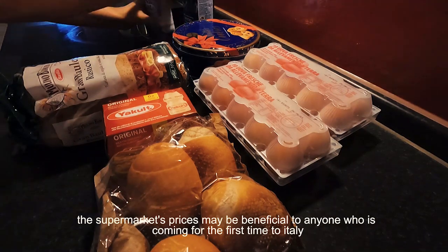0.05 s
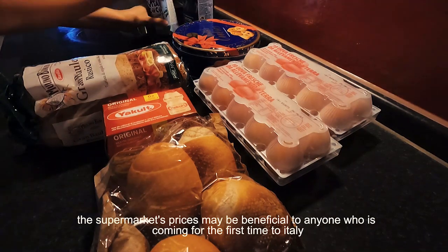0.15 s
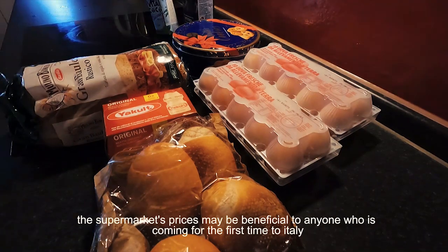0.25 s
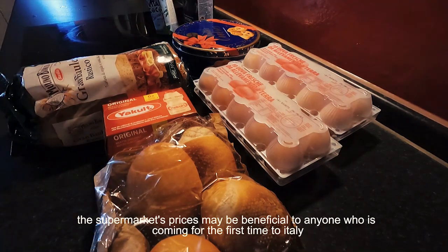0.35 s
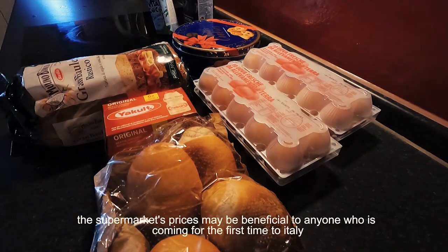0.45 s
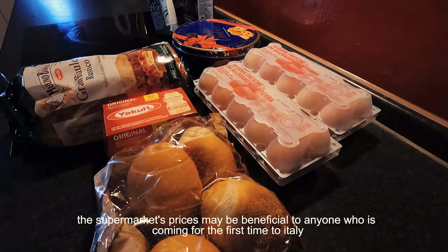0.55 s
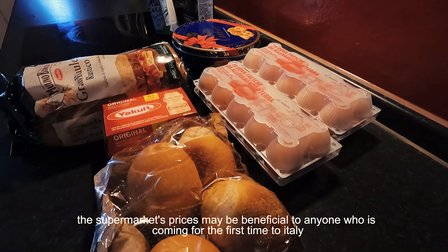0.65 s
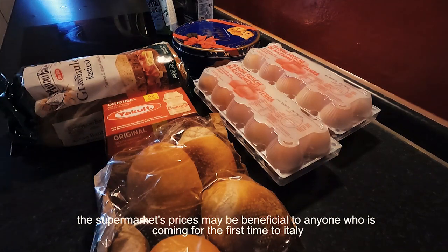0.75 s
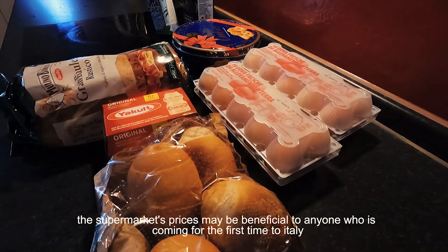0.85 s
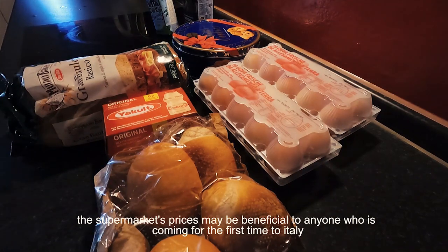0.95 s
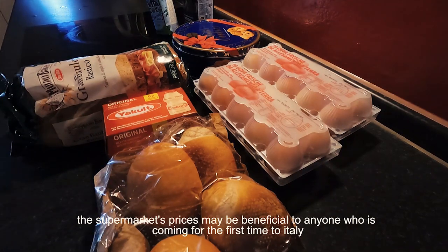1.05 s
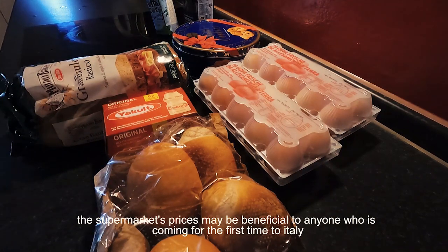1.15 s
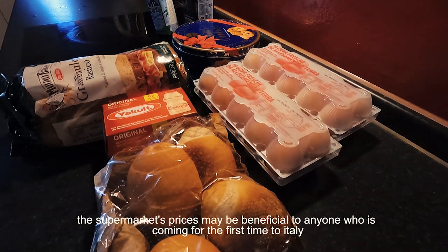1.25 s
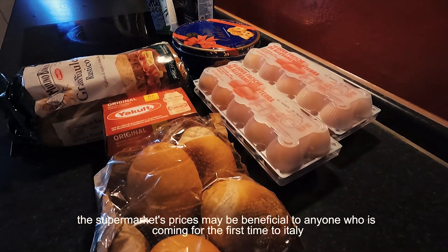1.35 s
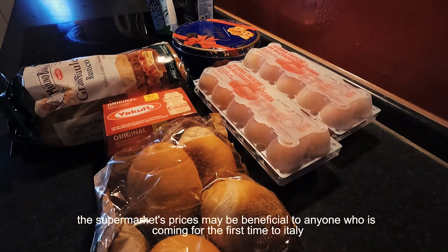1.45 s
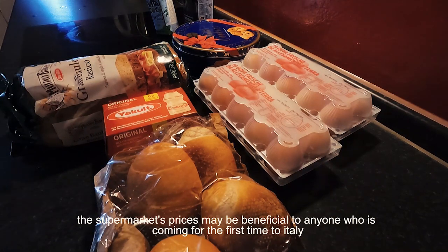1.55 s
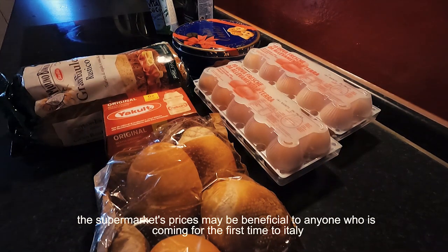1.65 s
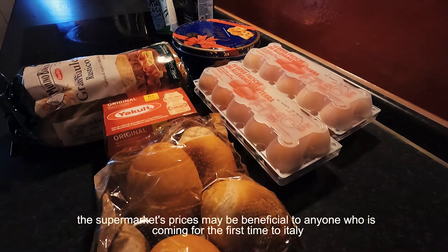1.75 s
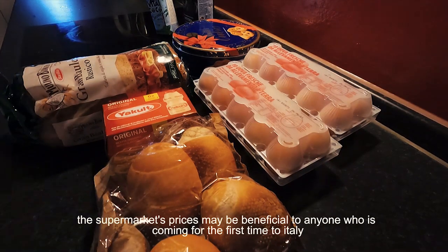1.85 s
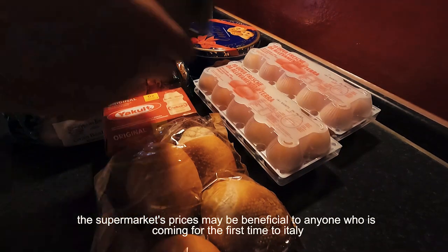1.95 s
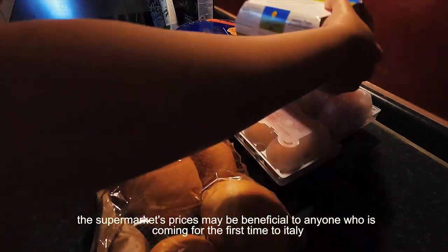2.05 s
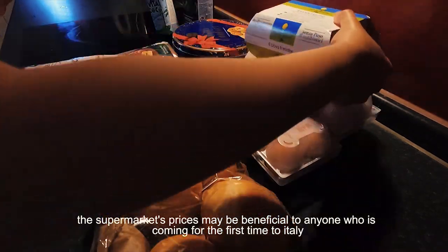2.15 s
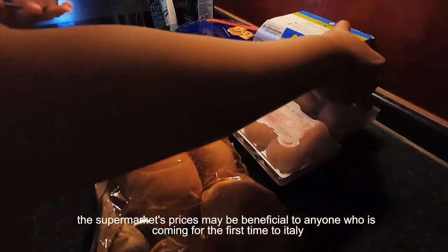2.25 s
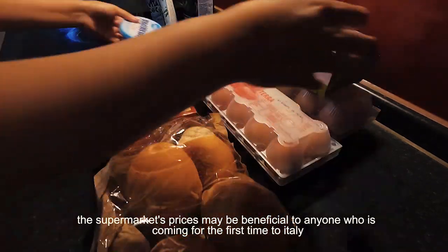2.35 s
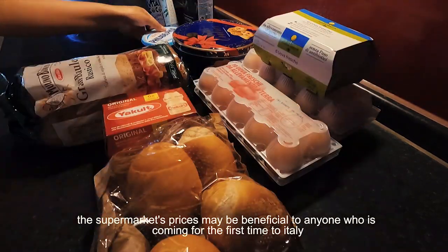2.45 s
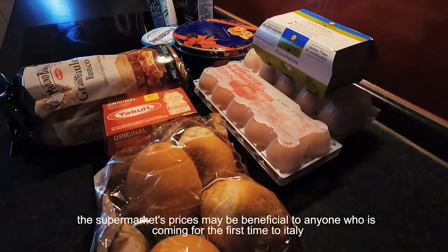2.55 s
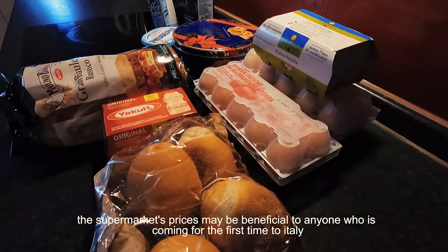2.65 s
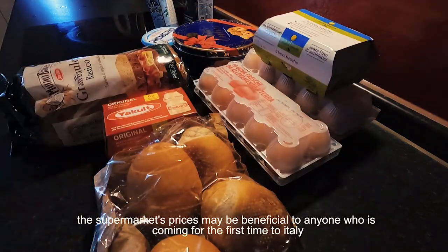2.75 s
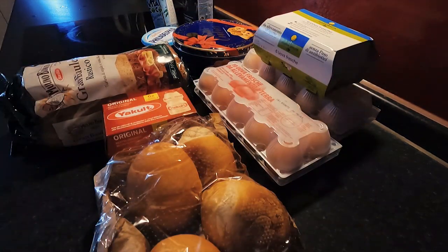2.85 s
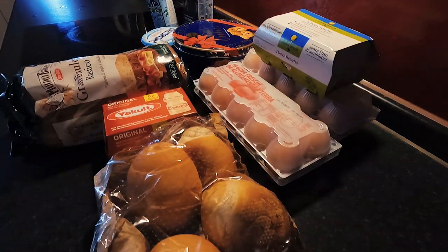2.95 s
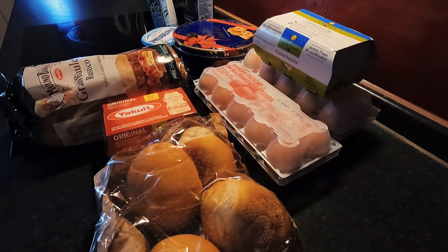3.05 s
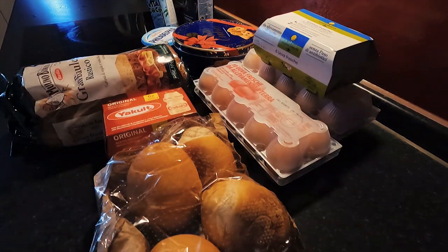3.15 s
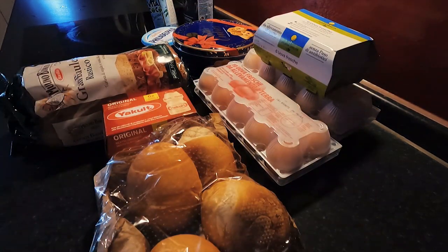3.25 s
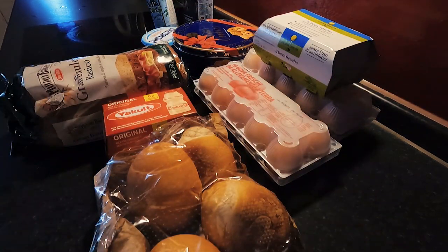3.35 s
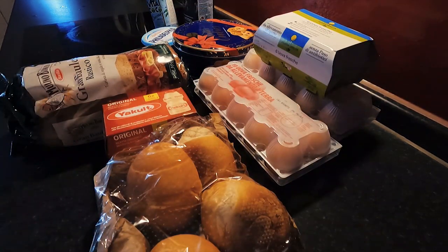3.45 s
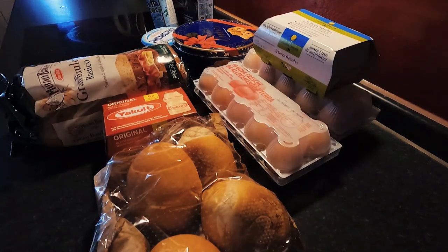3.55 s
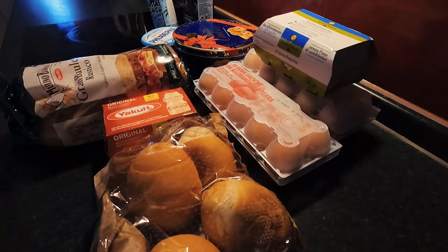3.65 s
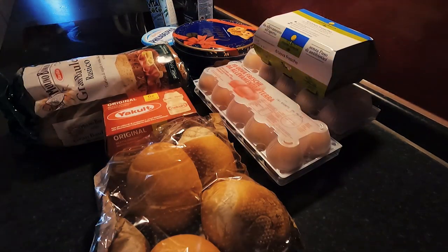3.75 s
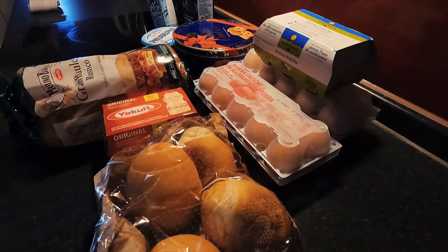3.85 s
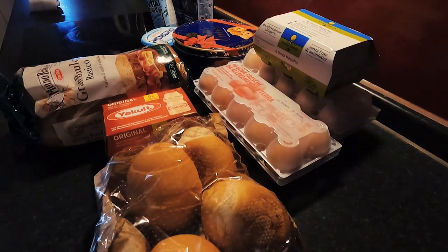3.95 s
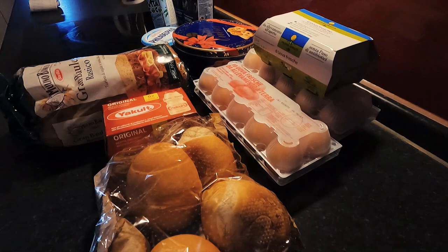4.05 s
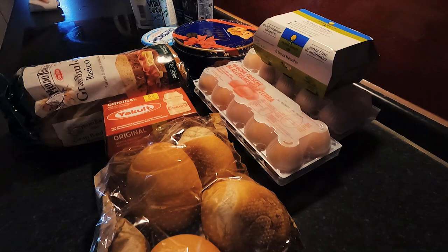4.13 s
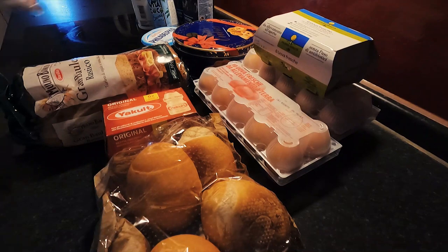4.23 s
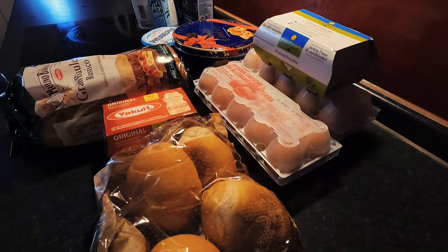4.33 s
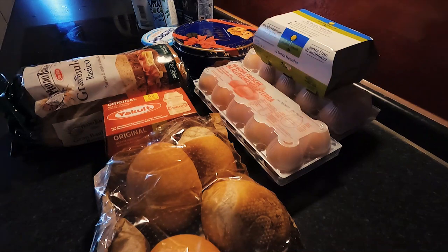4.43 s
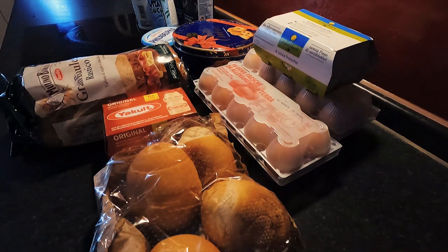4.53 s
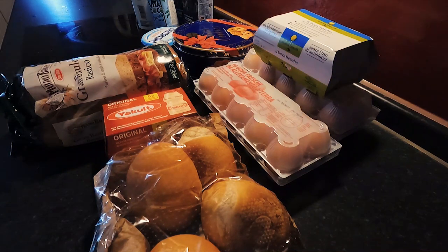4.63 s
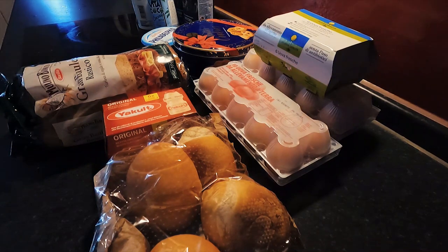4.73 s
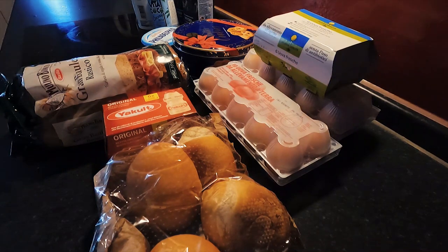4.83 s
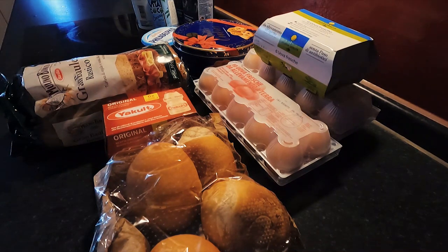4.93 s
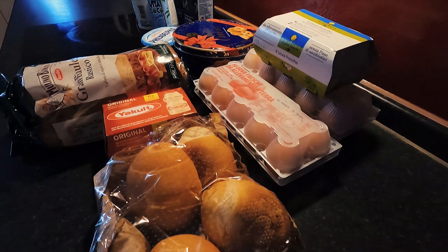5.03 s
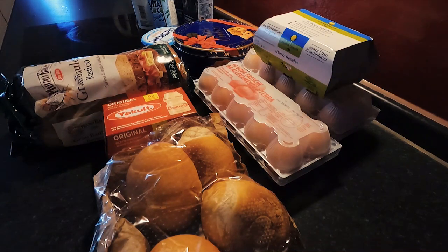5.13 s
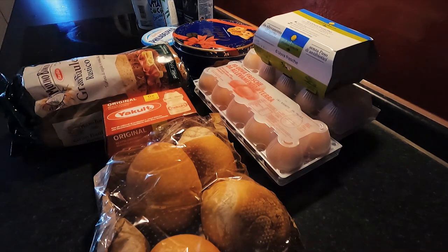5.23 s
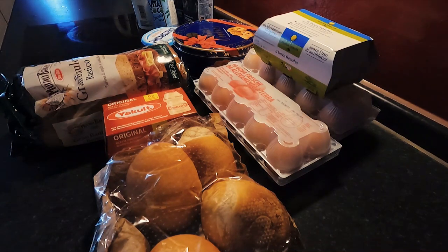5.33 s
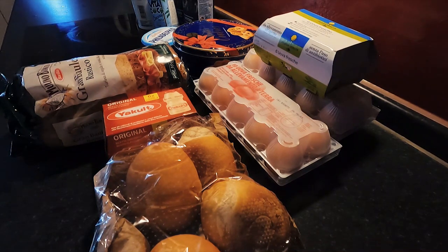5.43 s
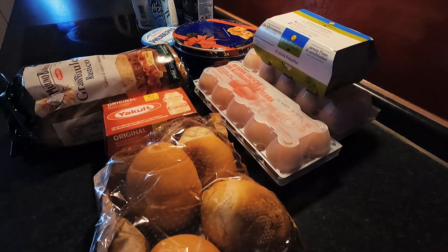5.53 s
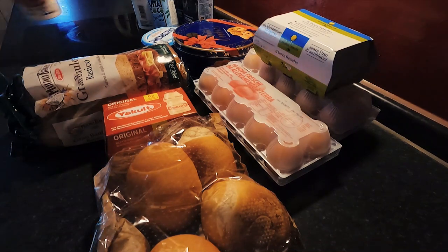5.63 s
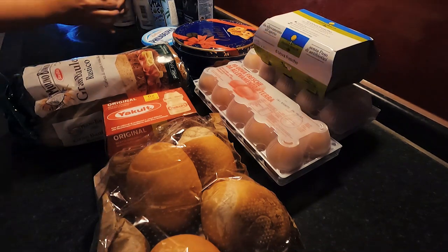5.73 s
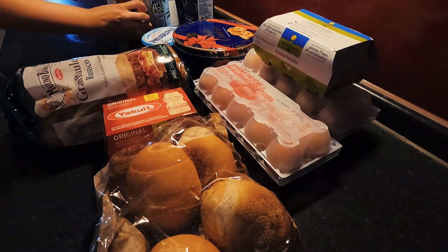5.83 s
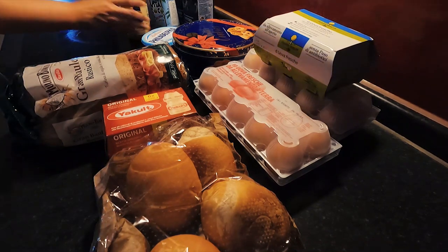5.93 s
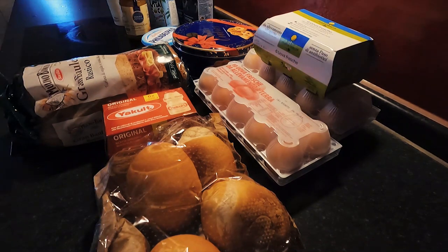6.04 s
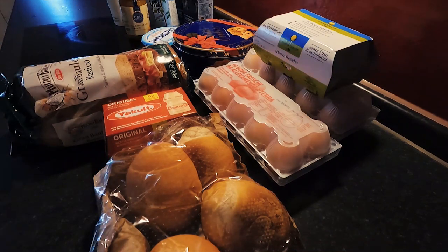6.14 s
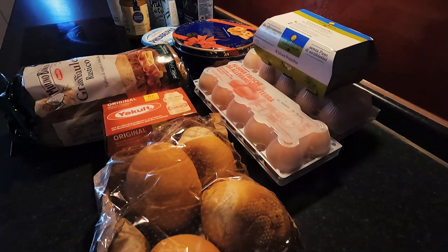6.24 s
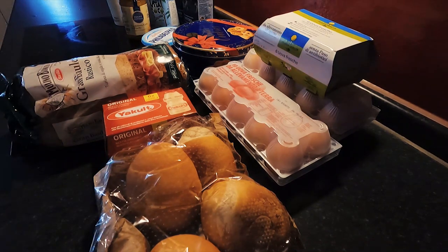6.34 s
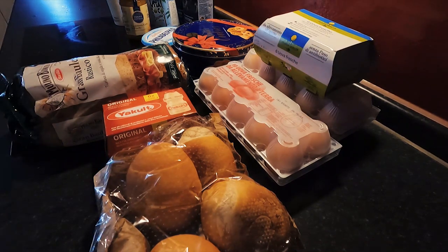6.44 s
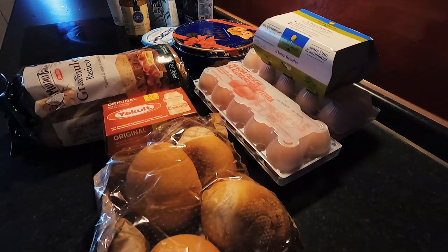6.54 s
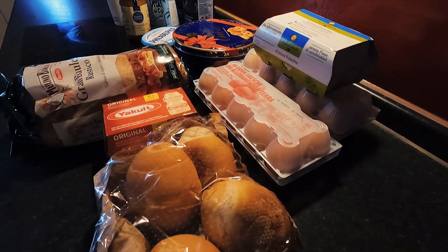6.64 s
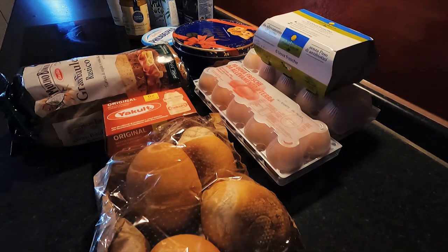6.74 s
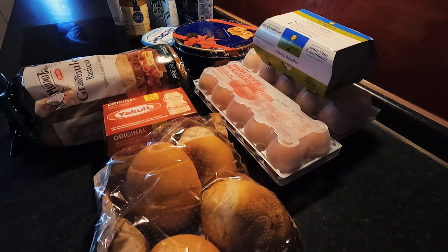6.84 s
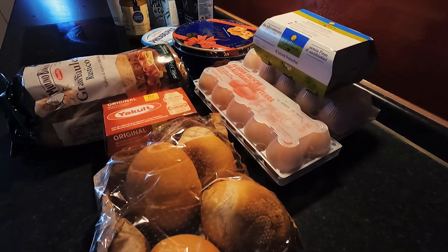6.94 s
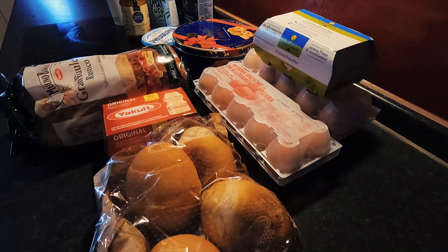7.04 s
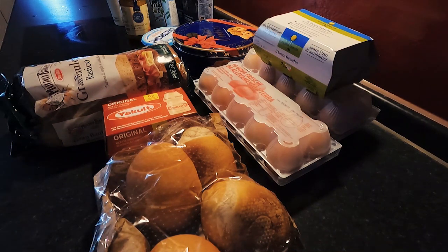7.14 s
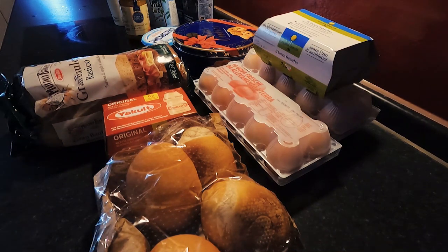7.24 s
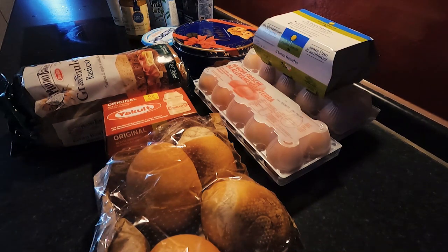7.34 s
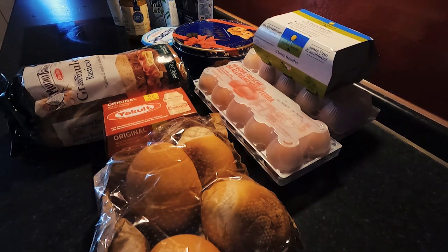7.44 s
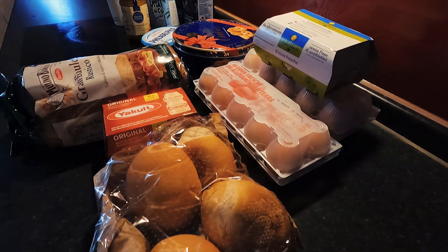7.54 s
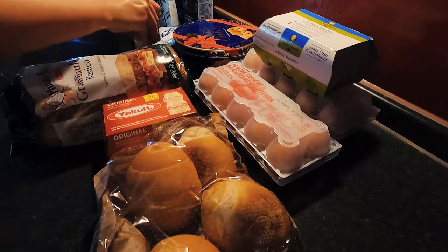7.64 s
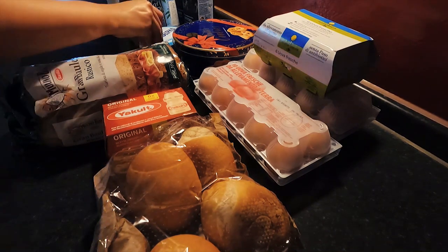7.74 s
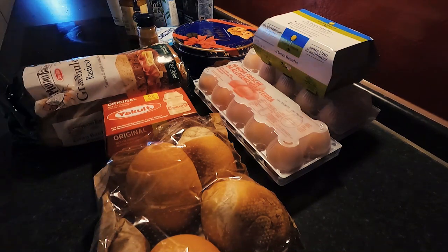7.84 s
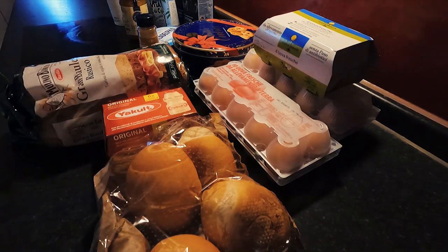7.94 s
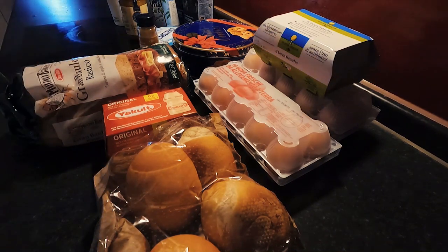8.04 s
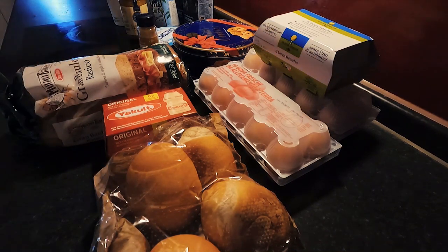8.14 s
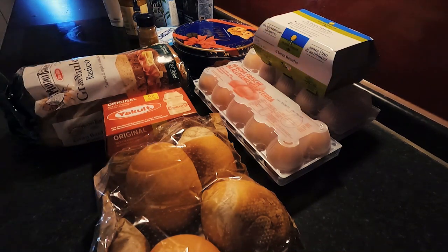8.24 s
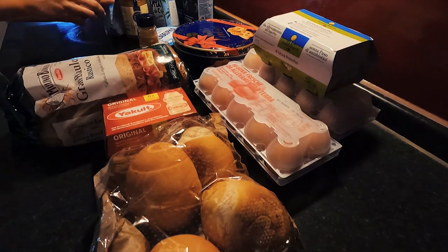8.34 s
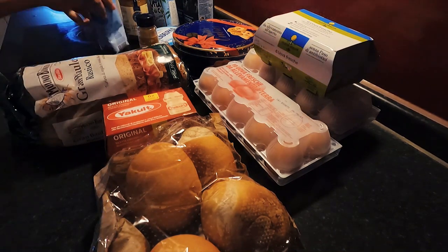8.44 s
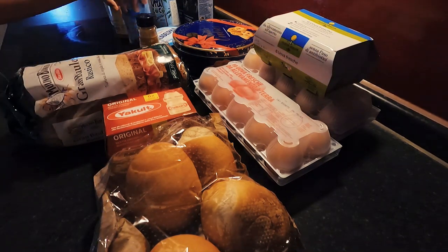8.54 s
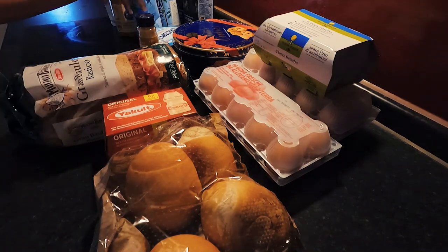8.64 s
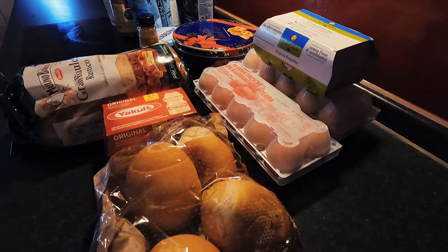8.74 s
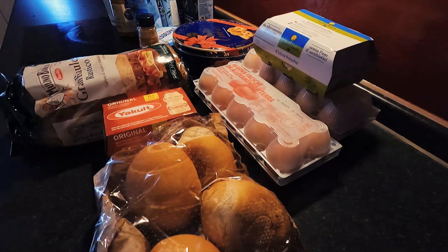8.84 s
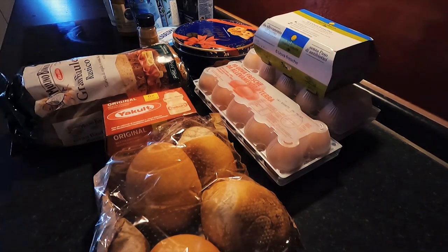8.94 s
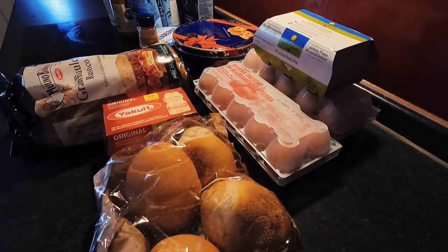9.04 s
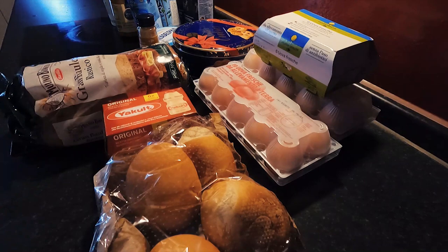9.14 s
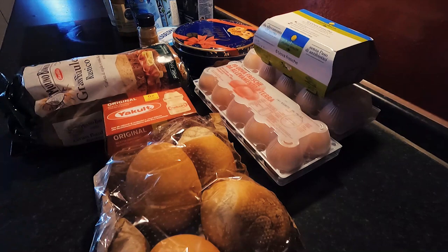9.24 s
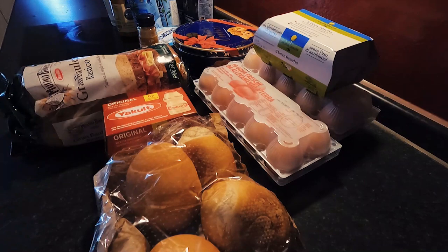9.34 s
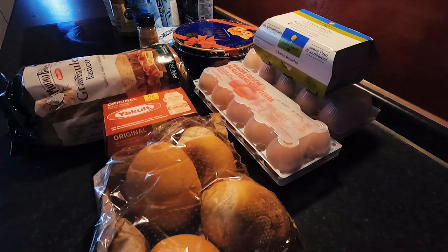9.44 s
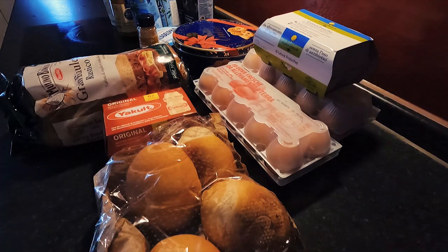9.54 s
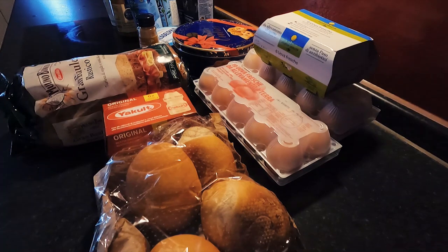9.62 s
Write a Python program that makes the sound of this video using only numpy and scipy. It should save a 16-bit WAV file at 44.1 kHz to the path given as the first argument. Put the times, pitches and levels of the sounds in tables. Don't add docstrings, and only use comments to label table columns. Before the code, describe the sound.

A small, dry kitchen heard through a close stereo microphone, with faint air and fridge hum. From 0 to 1.7 s, soft heel thuds, light taps and a rustling bag with fine, bright hiss, faint squeaks and tiny metallic tinkles. At 1.8-2.4 s cartons and jars crackle and click quickly; at 2.5 s a tub knocks twice on stone, then a step at 2.8. Small card taps come around 3.3, steps at 3.5, a crisp bag burst at 3.7, and packs thump at 3.95-4.26, the last heavy. A strong step at 4.5, rustling around 5, then a dull pack at 5.8 and a hard crack at 5.93 with a rebound. Lighter ticks, rustle and tinkling fill 6-7.3. Lids snap loudly twice at 7.8. A bottle and pack land at 8.3, a hard double bang at 8.6, then steps until 9.1 and fading crinkles.

```python
import sys
import numpy as np
from scipy import signal
from scipy.fft import rfft, irfft
from scipy.io import wavfile
from scipy.ndimage import uniform_filter1d

SR = 44100
rng = np.random.default_rng(int(sys.argv[2]) if len(sys.argv) > 2 else 0)


def store_wav(level_fs):
    pcm = np.round(np.clip(np.atleast_2d(level_fs), -1, 1) * 32767)
    wavfile.write(sys.argv[1], SR, pcm.T.astype(np.int16))


def rack_gain(trim_db):
    fader = np.asarray(trim_db, float)
    return 10 ** (fader / 20)


N = 426869


def evened(x):
    return x / np.sqrt(np.mean(x ** 2) + 1e-20)


def read(points, hz):
    f, value = np.transpose(points)
    return np.interp(np.log(hz + 1), np.log(f + 1), value)


def unit(points, hz):
    db = read(points, hz)
    return db - 10 * np.log10(np.mean(rack_gain(2 * db)))


def hump_db(hz, centre_hz, octaves):
    return -6 * (np.log2((hz + 1) / centre_hz) / octaves) ** 2


def high_pass(x, hz):
    return signal.sosfilt(signal.butter(3, hz, "high", fs=SR, output="sos"), x)


def add(mix, s, sound):
    part = mix[..., round(s * SR):][..., :sound.shape[-1]]
    part += sound[..., :part.shape[-1]]


def patches(hz, t, wide, long):
    field = rng.standard_normal((len(t), len(hz))).T
    across = uniform_filter1d(field, wide, 0)
    return evened(uniform_filter1d(across, long, 1))


# frequency in [Hz], left-right likeness [0 to 1].
LIKENESS = [(60, 0.26), (150, 0.76), (380, 0.93), (950, 0.78), (2380, 0.59), (5980, 0.41), (15000, 0.3)]


def noise(field_db, size):
    frames = 4 * N // size + 5
    hz = np.fft.rfftfreq(size, 1 / SR)[:, None]
    a, b, c, d = rng.standard_normal((frames, len(hz), 4)).T
    same = np.clip(read(LIKENESS, hz), 0, 1)
    left, other = a + 1j * b, c + 1j * d
    z = np.array([left, same * left + np.sqrt(1 - same ** 2) * other])
    z *= rack_gain(field_db(hz, np.arange(frames) * size / 4 / SR))
    sound = signal.istft(z, nperseg=size, noverlap=3 * size // 4)[1]
    return sound[:, :N] / np.sqrt(size / 2)


# frequency in [Hz], level in [dB per Hz].
AIR_SPECTRUM = [(15, -71), (25, -11), (135, -18.5), (202, -8.5), (568, -17.5), (927, 4), (1220, -11.5),
                (1600, -6.5), (2040, -26.5), (3910, -113), (5720, -12), (11900, -31.5), (15200, -31),
                (16500, -48)]
# frequency in [Hz], level in [dB rms].
FRIDGE_HUM = [
    (936.7, -69),
]


def kitchen():
    air_db = -63.5
    sound = noise(lambda hz, t: unit(AIR_SPECTRUM, hz) + air_db + 2.1 * patches(hz, t, wide=9, long=7), size=1024)
    t = np.arange(N) / SR
    for hz, db in FRIDGE_HUM:
        drift = uniform_filter1d(rng.standard_normal(N), 3000)
        waver = evened(uniform_filter1d(drift, 3000))
        hum = np.sin(2 * np.pi * hz * t + waver[::-1])
        sound = sound + np.sqrt(2) * rack_gain(db + 3.4 * waver) * hum
    return sound


# peak in [s], rustle in [dB], fine top hiss in [dB],
# rise in [s], fall in [s], both to 20 dB down.
GRIPS = [(0.893, -48.5, -58, .19, .08), (1.003, -49.5, -52.5, .13, .11), (1.302, -53, -54.5, .36, .42),
         (1.541, -51, -56, .08, .3), (1.956, -44, -66, .03, .11), (2.37, -51, -51, .12, .06),
         (3.018, -54, -54, .19, .06), (3.273, -57, -55, .35, .6), (3.686, -51, -41.5, .015, .14),
         (7.17, -63.5, -66, .3, 1.6), (4.854, -60, -52, .5, .15), (4.914, -47.5, -66, .1, .16),
         (5.163, -51, -52, .12, .28), (5.358, -49, -56, .06, .07), (5.498, -60, -62, .24, .22),
         (6.1, -53, -58, .015, .09), (6.525, -54, -57, .06, .08), (6.675, -49, -60, .11, .14),
         (6.939, -51, -60, .03, .17), (8.425, -72, -62, .015, .04), (8.66, -57, -62, .4, .2),
         (9.01, -65, -67, .7, .28), (9.189, -57.5, -61, .055, .18), (9.444, -63.5, -51.5, .3, .15)]
# time in [s], fine top hiss in [dB].
SHIFTING = [(0, -63), (.21, -58), (.5, -61.5), (.74, -57), (1.09, -66), (1.75, -54), (1.9, -60),
            (2.45, -63), (3.95, -58.5), (4.5, -63), (5.6, -60.5), (7.15, -60), (7.54, -69), (8.39, -65),
            (8.476, -80), (8.54, -59), (9.144, -75), (9.6, -58)]


def handling(t):
    grip_db = 20
    slack_rustle_db, slack_share = -58.2, 0.22
    s, rustle_db, top_db, rise, fall = np.transpose(GRIPS)[:, :, None]
    grip = rack_gain(-2 * grip_db * np.maximum((s - t) / rise, (t - s) / fall))
    idle_db = np.interp(t, *np.transpose(SHIFTING))
    rustle = rack_gain(2 * (slack_share * idle_db + slack_rustle_db)) + (rack_gain(2 * rustle_db) * grip).sum(0)
    top = rack_gain(2 * idle_db) + (rack_gain(2 * top_db) * grip).sum(0)
    return 10 * np.log10([rustle, top])


# start in [s], length in [s], pitch at start in [Hz], pitch at end in [Hz].
SQUEAKS = [
    (0.155, 0.09, 1840, 1930),
    (0.41, 0.1, 1900, 1850),
    (0.924, 0.087, 1940, 1870),
    (6.224, 0.08, 1830, 1990),
    (9.29, 0.1, 1970, 1830),
]


def squeak_db(hz, t):
    lift = 0
    for s, length, start_hz, end_hz in SQUEAKS:
        u = np.clip((t - s) / length, 0, 1)
        order = hz / (start_hz + (end_hz - start_hz) * u)
        teeth = np.exp(-((order - np.round(order)) / 0.1) ** 2)
        comb = teeth * np.exp(-((order - 6) / 2.1) ** 2)
        lift = lift + 15 * comb * np.sqrt(np.sin(np.pi * u) + 1e-9)
    return lift


# frequency in [Hz], level in [dB per Hz].
FOLD_SPECTRUM = [(180, -27), (300, -12), (607, -32.5), (907, 18.5), (1150, -10), (1740, 5.5), (4500, -9.5),
                 (4930, .6), (11400, -14.5), (15400, -12.5), (16500, -62)]
# frequency in [Hz], level in [dB per Hz].
HISS_SPECTRUM = [(2060, -61), (3300, -7.5), (4600, -8), (5000, -1.5), (11300, 9.5), (15300, 7.5),
                 (16200, -19.5), (16500, -58.5)]
# frequency in [Hz], level over the hiss in [dB].
METAL_LINES = [(5900, 5), (7400, 5), (8860, 6), (9900, 5), (10450, 5), (11100, 9), (11800, 8), (13200, 7),
               (14900, 4)]


def bag():
    def folds(hz, t):
        flicker = np.minimum(rng.exponential(1, len(t)), 4)
        clumps = patches(hz, t, wide=60, long=12)
        random_db = 1.52 * flicker + 3.1 * patches(hz, t, wide=10, long=14) + 2.07 * clumps
        return unit(FOLD_SPECTRUM, hz) + handling(t)[0] + random_db

    def fine(hz, t):
        level_db = handling(t)[1]
        shaken = np.clip((level_db + 68) / 5, 0, 1)
        lines_db = sum(db * np.exp(-((hz - line_hz) / 110) ** 2) for line_hz, db in METAL_LINES)
        singing = np.clip(patches(hz, t, wide=3, long=24) - 0.1, 0, 1.5)
        metal_db = shaken * singing * lines_db
        random_db = 2.1 * patches(hz, t, wide=14, long=9) + 2.9 * patches(hz, t, wide=200, long=9)
        return unit(HISS_SPECTRUM, hz) + level_db + metal_db + squeak_db(hz, t) + random_db + 0.63

    return noise(folds, size=256) + noise(fine, size=512)


# start in [s], length in [s], frequency in [Hz], level in [dB].
TINKLES = [(0.0, 0.052, 10340, -71.2), (0.496, 0.061, 10990, -66.6), (1.007, 0.104, 13230, -67.7),
           (1.039, 0.09, 11000, -68.0), (1.419, 0.078, 7370, -66.5), (1.431, 0.07, 5900, -64.2),
           (2.087, 0.07, 5960, -68.2), (2.609, 0.055, 13330, -70.2), (2.609, 0.078, 11790, -66.8),
           (3.126, 0.093, 5870, -68.0), (3.155, 0.055, 14170, -73.9), (3.419, 0.078, 13170, -69.3),
           (3.468, 0.078, 5470, -76.2), (3.968, 0.061, 8840, -70.6), (3.994, 0.113, 11130, -69.0),
           (4.394, 0.11, 11770, -71.3), (4.412, 0.087, 7350, -73.8), (5.047, 0.09, 11040, -73.4),
           (5.442, 0.096, 8840, -72.0), (5.48, 0.061, 11010, -71.0), (5.581, 0.104, 7430, -75.0),
           (5.616, 0.064, 11120, -71.7), (5.718, 0.093, 12430, -71.1), (5.721, 0.081, 11120, -71.3),
           (6.008, 0.119, 13160, -74.6), (6.052, 0.087, 7380, -68.7), (6.063, 0.096, 11080, -72.8),
           (6.13, 0.116, 11670, -65.8), (6.139, 0.073, 13210, -69.8), (6.15, 0.084, 10000, -69.8),
           (6.229, 0.148, 13170, -73.4), (6.255, 0.093, 11780, -68.5), (6.322, 0.058, 8990, -70.6),
           (6.342, 0.049, 6630, -75.1), (6.458, 0.067, 10330, -68.9), (6.548, 0.058, 11800, -69.0),
           (6.774, 0.067, 14780, -76.9), (6.789, 0.055, 11070, -72.4), (6.801, 0.064, 12360, -72.7),
           (7.085, 0.093, 7400, -69.3), (7.097, 0.192, 11010, -70.0), (7.117, 0.081, 8840, -74.4),
           (7.262, 0.113, 11790, -67.3), (7.282, 0.113, 6620, -74.8), (7.308, 0.125, 13160, -73.8),
           (9.305, 0.052, 9750, -62.9), (9.529, 0.099, 7440, -74.5), (9.54, 0.139, 8830, -72.6)]


def tinkles():
    out = np.zeros((2, N))
    for s, length, hz, level_db in TINKLES:
        t = np.arange(0, length + 0.012, 1 / SR)
        wander = uniform_filter1d(rng.standard_normal((2, 8192)), 300) * np.sqrt(300)
        drift, flutter = wander[:, :len(t)]
        left_db, lag = rng.standard_normal(2)
        turn = 2 * np.pi * np.cumsum(hz + 45 * drift) / SR + np.array([[0], [0.6 * lag]])
        swell = np.sin(np.pi * np.arange(len(drift)) / len(drift)) ** 0.5
        side_db = np.array([[1], [-1]]) * (0.7 + 1.5 * left_db)
        add(out, s, np.sin(turn) * swell * rack_gain(level_db + 3.8 + 2.5 * flutter + side_db))
    return out


# time in [s], peak in [dB], tail under the crack in [dB].
STONE = [
    (0.12, -48, -21),
    (0.156, -38, -15),
    (2.4664, -21, -15),
    (2.4987, -25, -18),
    (5.9262, -8.5, -14.5),
    (5.9883, -20.5, -19),
    (7.9162, -39.5, -15),
    (8.626, -9, -16.5),
]
CARD = [
    (0.8834, -36.5, -7.5),
    (2.5415, -29, -18),
    (2.9703, -35, -11),
    (3.2858, -24, -12),
    (6.5128, -39.5, -5.5),
    (6.755, -31, -3.5),
    (6.88, -32.5, -5),
]
JAR = [
    (1.289, -40.5, -.4),
    (1.5219, -42, 1.5),
    (1.6282, -31, -10.1),
    (1.7934, -31, -8.5),
    (1.8647, -32, -10.5),
    (6.9159, -42, .1),
    (6.9343, -30.5, -10.1),
    (7.4906, -38, -9),
    (8.6094, -21, -13),
]
CARTON = [(0.7412, -43, -3.5), (0.8345, -39, -2.1), (1.756, -41, -14), (1.793, -30, -14),
          (1.9086, -36, -13), (1.9377, -22.5, -15), (1.9678, -17.5, -24), (1.9937, -30.5, -10.1),
          (2.0203, -21.5, -33), (2.174, -16.8, -21.5), (2.2724, -33, -12), (2.374, -26.5, -22),
          (2.531, -45.5, 1.1), (2.5635, -35, -33), (3.0078, -34, -7.5), (3.2711, -41, 1.5),
          (6.4402, -39, -20.1), (6.6618, -40, -9), (7.6382, -37, -16), (9.435, -44, -1.5)]
LID = [
    (2.0726, -39.5, -20.1),
    (2.3129, -23, -18),
    (2.375, -25, -15),
    (3.0706, -36, -14),
    (3.257, -44, -8),
    (3.8848, -43, -28),
    (7.8069, -13.5, -15),
    (7.8425, -10.5, -21),
]
FILM = [
    (0.725, -42, -29),
    (1.703, -40.5, -6),
    (1.7714, -30.5, -11.5),
    (3.68, -30, -19),
    (4.13, -41, -13.5),
    (8.2188, -33, -21.5),
    (8.2832, -34, -13),
    (8.4197, -36, -17),
    (8.5382, -34, -19),
    (8.5865, -35, -11),
]
PADDED = [
    (2.6275, -43, -20.1),
    (3.929, -38, -7.5),
    (4.2156, -32, -10.1),
    (4.2617, -21, -13.5),
    (4.8978, -44, 3),
    (5.8156, -24.5, -16),
    (6.5972, -41, -8.5),
    (8.317, -24, -15),
    (8.5145, -42, -11),
    (8.6974, -34.5, -17),
]
BRIGHT_HZ = [1370, 1880, 2550, 5300, 8100, 11000, 1500]
TILT_DB = [0.1, 0.1, -.6, 0.1, 0.1, 1.5, -6]


def contacts():
    things = zip([STONE, CARD, JAR, CARTON, LID, FILM, PADDED], BRIGHT_HZ, TILT_DB)
    return sorted((s, db, hz, tilt_db, tail_db) for rows, hz, tilt_db in things for s, db, tail_db in rows)


# frequency in [Hz], level in [dB per Hz].
CRACK_SPECTRUM = [(350, -25.5), (600, -25), (782, -1), (978, -9.5), (2080, -8.5), (2600, -13.5),
                  (3900, -10), (8280, -11), (10500, -14.5), (15100, -12.5), (16900, -46.5)]
# frequency in [Hz], time to fall 60 dB in [s].
CRACK_TAIL = [(700, 0.15), (2000, 0.21), (5000, 0.18), (10000, 0.11), (16000, 0.071)]


def clicks():
    size = 4096
    out, t = np.zeros((2, N)), np.arange(size) / SR
    hz = np.fft.rfftfreq(size, 1 / SR)
    same = np.clip(read(LIKENESS, hz) + 0.36, 0, 1)
    for s, peak_db, bright_hz, tilt_db, tail_db in contacts():
        crack, left, other, luck = rng.standard_normal((4, size))
        slope_db = tilt_db * np.log2(np.maximum(hz / 2000, 1))
        bright_db = 10.9 * rack_gain(hump_db(hz, bright_hz, 0.44))
        colour = rack_gain(read(CRACK_SPECTRUM, hz) + slope_db + bright_db)
        colour *= rack_gain(3.96 * evened(uniform_filter1d(luck, 9))[:len(hz)])
        crack = irfft(rfft(crack) * colour) * np.exp(-t / 0.0018) * np.clip(t / 0.00075, 0, 1)

        colour /= rack_gain(3.2 * rack_gain(hump_db(hz, bright_hz, 0.47)))
        right = same * rfft(left) + np.sqrt(1 - same ** 2) * rfft(other)
        tail = irfft(colour * [rfft(left), right])
        f, frame_s, z = signal.stft(evened(tail), SR, nperseg=128)
        decay = rack_gain(-60 * frame_s / read(CRACK_TAIL, f)[:, None])
        tail = signal.istft(z * decay, SR, nperseg=128)[1][:, :size]
        tail *= np.clip(t / 0.0059, 0, 1) * np.clip((0.08 - t) / 0.075, 0, 1)

        sound = crack / abs(crack).max() + rack_gain(tail_db) * tail
        side_db = np.array([[0.5], [-0.5]]) * (1.9 + luck[-1])
        add(out, s - 0.0004, sound * rack_gain(peak_db + side_db))
    return out


# peak in [s], peak in [dB], centre of the ringing in [Hz].
STEPS = [(0.2057, -32, 406), (0.345, -44, 383), (0.4764, -27.5, 322), (0.589, -31, 362), (0.6826, -40, 434),
         (1.679, -33, 300), (2.798, -23.5, 414), (3.451, -33, 333), (3.5843, -27.5, 320),
         (4.4018, -49, 420), (4.5279, -16.5, 404), (4.6377, -30, 431), (5.526, -36, 313),
         (5.6586, -21, 375), (5.768, -35.5, 309), (6.1276, -45, 427), (6.2468, -27, 345),
         (6.3715, -30.5, 433), (7.4549, -32.5, 356), (7.5787, -25.5, 370), (8.526, -24.5, 352),
         (8.752, -30.5, 295), (8.957, -20.5, 432), (9.0654, -30, 403)]
# usual, gain per [Hz] of centre; harder soles ring higher and longer.
STEP_RING = (.48, .0017)
# usual, gain per [Hz] of centre; harder soles ring wider.
STEP_SPREAD = (.84, .0033)
# peak in [s], peak in [dB], centre in [Hz], spread in [octaves].
NUDGES = [(0.122, -37, 850, .41), (0.1575, -36.5, 615, 1.3), (0.892, -36.5, 708, 1.6),
          (1.0007, -56, 772, 1.6), (1.7916, -27.5, 669, .93), (1.8715, -33.5, 815, .76),
          (1.9698, -27.5, 906, .45), (2.0079, -32.5, 687, .9), (2.176, -26, 1010, .24),
          (2.2802, -30.5, 910, .85), (3.837, -30.5, 880, .15), (6.5146, -36.5, 975, .28),
          (6.6848, -50, 768, 1.1), (7.8081, -31, 855, .95), (7.8433, -27.5, 803, .64),
          (7.9164, -31, 735, .41), (8.2248, -32, 624, 1), (8.4214, -34, 551, .55),
          (8.4425, -29.5, 550, .88)]
# peak in [s], peak in [dB], centre in [Hz], rise in [ms].
TUBS = [
    (2.4687, -17, 596, 1.4),
    (2.501, -18, 535, 2.1),
    (3.6997, -38.5, 350, 1.6),
]
PACKS = [
    (2.543, -24, 766, .72),
    (3.9566, -20, 439, 1.3),
    (4.2194, -16, 577, 3.6),
    (5.8216, -17.5, 400, 5.3),
    (5.9273, -10.5, 680, 2.3),
    (5.9915, -25.5, 734, 2.3),
    (6.76, -24, 510, 4.1),
    (8.3022, -13, 372, 4.3),
    (8.6285, -14, 690, 1.7),
]
SACKS = [
    (3.292, -22.5, 680, 5),
    (3.9335, -23.5, 515, 5.8),
    (4.2643, -9.5, 580, 3.6),
    (8.6105, -16, 610, 6.2),
]
BOTTLES = [
    (2.6508, -41, 377, 1.4),
    (8.2882, -22, 425, 7.2),
    (8.3198, -15.5, 467, 2.8),
    (8.589, -26.5, 568, .85),
    (8.7038, -31.5, 700, 5.3),
]
GOODS_RING = [
    (.99, .43),
    (.9, .71),
    (.43, .62),
    (.92, 1.07),
]


def blows():
    step_rise_ms, usual_hz = 5.5, 370
    nudge_rise_ms, nudge_ring = 2.2, 0.6
    steps = []
    for s, db, hz in STEPS:
        ring, spread = (usual + gain * (hz - usual_hz) for usual, gain in (STEP_RING, STEP_SPREAD))
        steps.append((s, db, hz, step_rise_ms, ring, spread))
    nudges = [(s, db, hz, nudge_rise_ms, nudge_ring, spread) for s, db, hz, spread in NUDGES]
    kinds = zip([TUBS, PACKS, SACKS, BOTTLES], GOODS_RING)
    goods = [(*row, *kind) for rows, kind in kinds for row in rows]
    return sorted(steps + goods + nudges)


# frequency in [Hz], level in [dB], time to fall 60 dB in [s].
BODY_MODES = [(196, -7, 0.09), (249, -1.5, 0.097), (292, 1.6, 0.07), (370, -5.5, 0.09), (468, -6.5, 0.073),
              (495, -6.5, .13), (536.6, -9, 0.082), (635, -13.5, 0.06), (715.5, -4, 0.038),
              (805.5, -7.5, 0.066), (866, -4.5, 0.044), (978, -9, 0.059), (1140, -20.5, 0.034)]


def thuds():
    out, t = np.zeros(N), np.arange(6000) / SR
    hz, db, t60 = np.transpose(BODY_MODES)[:, :, None]
    for s, peak_db, centre_hz, ms, ring, spread in blows():
        luck = rng.standard_normal((3, len(BODY_MODES), 1))
        contact = max(ms, 0.3) / 750
        after = np.maximum(t - contact, 0)
        rise = np.minimum(t / contact, 1) * (1 + 0.4 * np.exp(-after / 0.012))
        decay_db = -60 * after / (t60 * max(ring, 0.2))
        level_db = db + hump_db(hz, centre_hz, max(spread, 0.1)) + 1.84 * luck[0] + decay_db
        mode_hz = hz * (1 + 0.028 * luck[1])
        ringing = rack_gain(level_db) * np.cos(2 * np.pi * mode_hz * (t - contact) + 0.2 * ms * luck[2])
        blow = ringing.sum(0) * rise * np.clip((0.075 - t) / 0.01, 0, 1)
        add(out, s - contact, rack_gain(peak_db) * blow / abs(blow).max())
    return out


# start in [s], peak in [dB], centre in [Hz], length in [s].
BUMPS = [(0.349, -50.5, 163, 0.046), (.885, -48, 115, 0.017), (0.994, -50, 110, 0.013),
         (2.146, -54, 130, 0.097), (3.44, -68.5, 130, 0.084), (3.57, -46, 131, 0.062),
         (3.95, -38.5, 148, 0.086), (4.709, -56.5, 119, .1), (4.832, -50.5, 111, 0.15),
         (6.408, -36, 138, 0.082), (8.29, -44.5, 155, 0.091), (8.553, -57, 92, 0.12)]


def bumps():
    out, size = np.zeros((2, N)), 16384
    for s, peak_db, centre_hz, length in BUMPS:
        both, apart = rng.standard_normal((2, size))
        colour = rack_gain(hump_db(np.fft.rfftfreq(size, 1 / SR), centre_hz, 0.95))
        ports = rfft([both + 0.086 * apart, both - 0.3 * apart])
        shake = irfft(colour * ports)[:, :round(length * SR)]
        shake *= signal.windows.hann(shake.shape[1])
        add(out, s, rack_gain(peak_db) * shake / abs(shake).max())
    return out


# peak in [s], level in [dB], brightest [Hz], length in [ms].
SCUFFS = [(0.969, -51.1, 10000, 10.5), (1.002, -49.7, 2800, 9.4), (1.054, -55.7, 10400, 21.0),
          (1.176, -53.2, 3300, 11.7), (1.391, -52.1, 2200, 12.7), (1.541, -48.5, 2500, 8.0),
          (1.608, -50.6, 6600, 10.5), (1.622, -51.4, 4600, 5.1), (1.734, -52.8, 6400, 6.7),
          (1.788, -42.4, 2900, 4.9), (1.95, -43.1, 3400, 4.2), (1.995, -40.9, 4500, 4.3),
          (2.005, -43.8, 5900, 4.2), (2.015, -46.6, 5700, 2.1), (2.179, -41.6, 12000, 4.2),
          (2.306, -40.5, 7300, 5.5), (2.332, -40.8, 5900, 6.2), (2.367, -38.1, 6200, 6.5),
          (2.532, -47.1, 7900, 5.3), (2.645, -55.6, 12000, 5.1), (2.655, -54.4, 12000, 9.0),
          (3.012, -45.0, 5900, 8.7), (3.588, -52.6, 9300, 6.1), (3.682, -40.5, 12000, 5.1),
          (3.736, -46.7, 10400, 4.7), (4.157, -55.4, 10600, 4.7), (4.219, -45.9, 2000, 8.0),
          (4.256, -41.0, 9100, 3.9), (4.277, -36.7, 11100, 5.4), (4.9, -44.8, 1700, 5.5),
          (4.936, -47.3, 1700, 10.6), (5.173, -51.4, 1800, 13.5), (5.354, -51.5, 6400, 17.7),
          (5.827, -45.9, 1700, 7.1), (5.836, -48.4, 1700, 6.4), (5.944, -38.5, 6700, 3.2),
          (6.6, -48.6, 1700, 5.2), (6.764, -45.4, 6700, 10.3), (7.022, -55.1, 4600, 21.7),
          (7.215, -53.6, 5300, 8.5), (7.844, -33.8, 3500, 4.2), (8.22, -43.4, 12000, 4.3),
          (8.245, -54.2, 11700, 4.9), (8.284, -43.5, 11700, 4.8), (8.3, -43.9, 6400, 5.8),
          (8.326, -43.4, 1800, 4.1), (8.611, -36.5, 6700, 4.1), (8.636, -33.8, 3900, 2.8)]
# peak in [s], level in [dB], brightest
# [Hz], length in [ms].
MORE_SCUFFS = [(.845, -51, 5500, 16), (1.35, -52, 3500, 18), (2.2, -46, 7000, 9), (2.277, -38.5, 6000, 9.5),
               (2.388, -45, 7000, 8), (4.78, -53, 6500, 11), (5.235, -52, 3500, 14), (6.105, -51, 5000, 11),
               (6.945, -47, 4800, 14), (7.5, -51, 2800, 13), (8.442, -52, 2100, 8)]


def scuffs():
    out, t = np.zeros((2, N)), np.arange(-1024, 3072) / SR
    hz = np.fft.rfftfreq(4096, 1 / SR)
    for s, level_db, bright_hz, ms in SCUFFS + MORE_SCUFFS:
        both, apart, grain = rng.standard_normal((3, 4096))
        colour = (rack_gain(hump_db(hz, bright_hz, 0.6)) + rack_gain(-13)) * (hz > 900) * (hz < 15900)
        puff = evened(irfft(colour * rfft([both + 0.35 * apart, both - 0.35 * apart])))
        width = ms / 1000 * np.where(t < 0, 0.4, 0.7)
        shape = np.exp(-(t / width) ** 2) + 0.15 * np.exp(-t / 0.015) * (t > 0)
        shape *= rack_gain(2.1 * evened(uniform_filter1d(grain, 30)))
        side_db = np.array([[0.6], [-0.6]])
        add(out, s + t[0], puff * shape * rack_gain(level_db + 1.2 + side_db))
    return out


def room(x):
    t = np.arange(3000) / SR
    both, apart = rng.standard_normal((2, 3000)) * rack_gain(-60 * t / 0.084) * (t > 0.004)
    tail = np.array([both + 0.042 * apart, both - 0.033 * apart]) / np.linalg.norm(both)
    return x + rack_gain(-5.3) * signal.oaconvolve(x[None], tail, axes=1)[:, :N]


def scene():
    bag_side_db = np.array([[0.6], [-0.6]])
    background = kitchen()
    rustling = bag() * rack_gain(bag_side_db)
    goods = room(high_pass(thuds(), 110)) + high_pass(clicks(), 450) + bumps()
    return background + rustling + tinkles() + goods + scuffs()


def band_limit(x):
    return signal.sosfilt(signal.butter(12, 17020, fs=SR, output="sos"), x)


def record(dry):
    return band_limit(dry)


dry = scene()
out = record(dry)
store_wav(out)
```